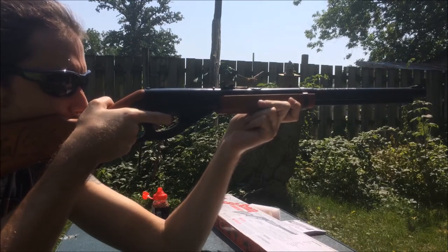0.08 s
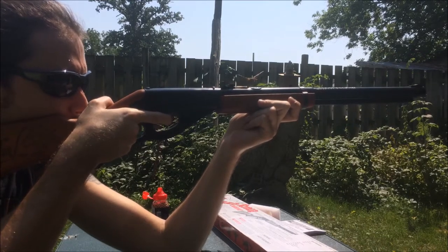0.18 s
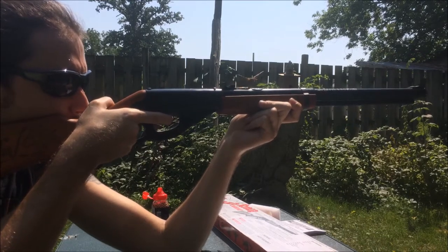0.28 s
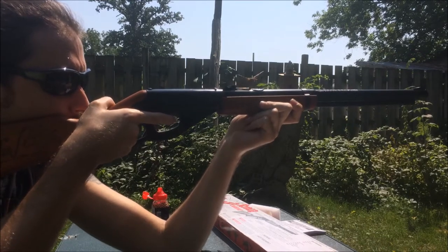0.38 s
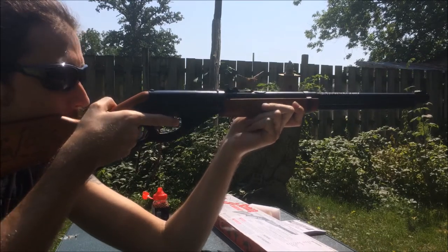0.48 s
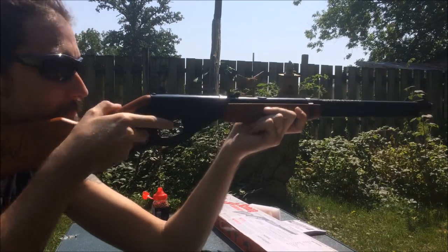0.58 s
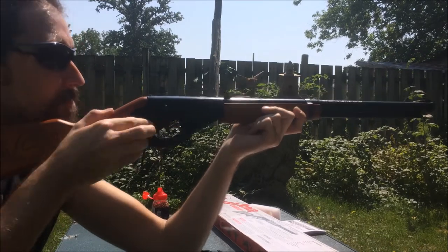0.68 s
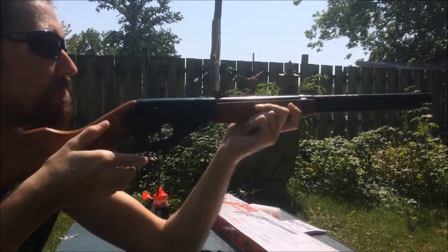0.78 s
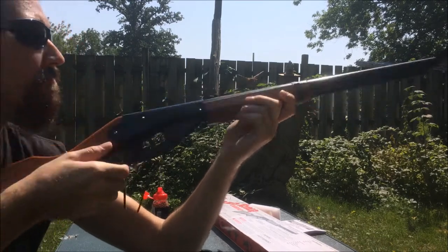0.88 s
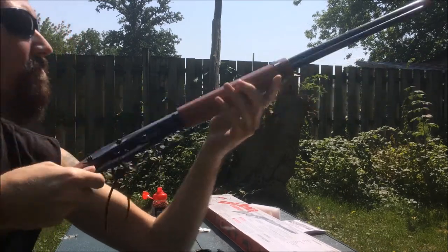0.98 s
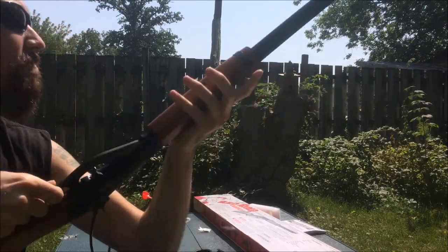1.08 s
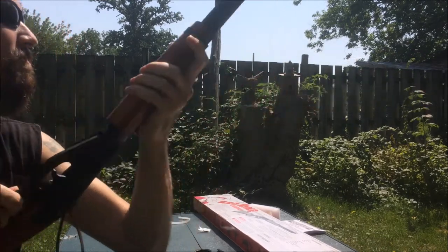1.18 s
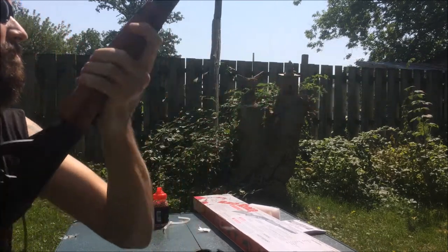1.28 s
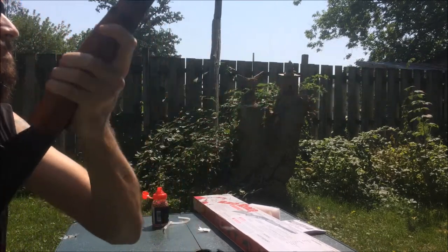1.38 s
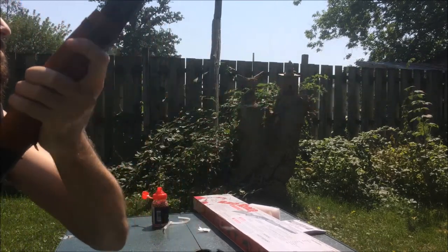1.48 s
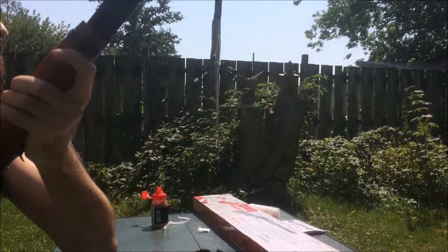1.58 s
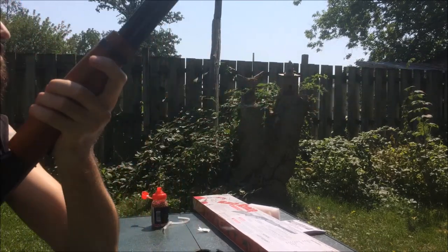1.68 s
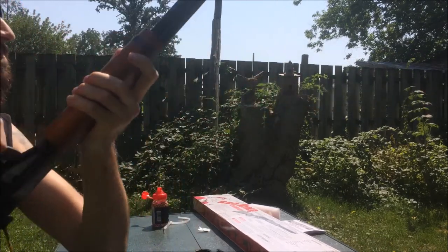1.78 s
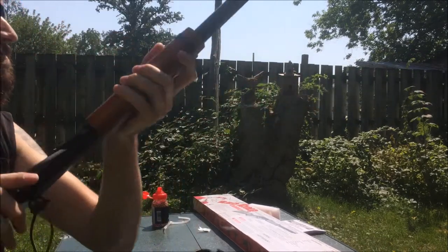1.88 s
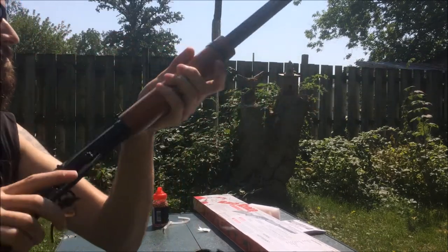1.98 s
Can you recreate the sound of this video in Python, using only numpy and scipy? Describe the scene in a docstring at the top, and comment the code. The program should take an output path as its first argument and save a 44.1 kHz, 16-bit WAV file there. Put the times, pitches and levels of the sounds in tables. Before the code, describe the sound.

A close air rifle fires with one sharp, rattly crack, and the pellet pings a metal target. Loose pellets then pour down the magazine and the cocking lever ratchets, against faint wind in a quiet yard.

```python
"""Lever-cocked spring air rifle, close, in a quiet fenced yard.
The piston slams and the spring chatters, ringing receiver and shroud; the pellet rings a metal target.
Rifle tilted up: loose pellets pour down the magazine, the lever ratchets, a few last pellets tick.
Background: wind, far traffic, leaves, insects."""
import sys
import numpy as np
from scipy import signal
from scipy.io import wavfile

SR = 44100
rng = np.random.default_rng(int(sys.argv[2]) if len(sys.argv) > 2 else 0)


def to_wav(sig):
    """Store sig (one row per channel, or 1-D mono) as 16-bit WAV at the path in sys.argv[1].

    Samples outside -1..1 are clipped; the rate is SR.
    """
    pcm = np.clip(np.atleast_2d(sig), -1, 1) * 32767
    pcm = np.round(pcm).astype(np.int16)
    wavfile.write(sys.argv[1], SR, pcm.T)  # frames by channels


N = 88200

# Levels are relative. Spectra are densities. Positive tilt favours the bass.
# trigger tick, piston slam, spring chatter: t/s, level/dB, tilt/(dB/oct)
SLAMS = [(0.1929, -31, 2), (0.209, -1, -0.5), (0.2119, -5.5, 2), (0.2171, -16, 7), (0.2196, -8.5, 1.5),
         (0.2263, -15, 4), (0.2385, -7, -0.5), (0.2457, -4.5, 1.2), (0.2535, -8, -3.5),
         (0.2592, -10.5, 1.5)]
SLAM_SPECTRUM = [(280, -6), (850, -4.5), (1200, 1), (2500, 6.5), (6000, 5.5), (16000, -1.5)]  # slam and tail noise: f/Hz, level/dB
TAIL_DECAY = [(200, 0.21), (1500, 0.16), (15000, 0.32)]  # rattling tail: f/Hz, t60/s
RECEIVER_MODES = [(153, -28.5, 0.015), (3620, -12.5, 0.031), (6770, -13.5, 0.042)]  # f/Hz, level/dB, t60/s
HITS = [(.3735, -2, 0), (.3852, -8, -1.5)]  # pellet on target, direct and second arrival: t/s, level/dB, tilt/(dB/oct)
TARGET_MODES = [(2202, -21, 1.1), (3640, -19, .5), (3984, -7, .37), (5087, -13, .4), (5356, -11, .44),
                (7510, -8, .15), (8053, -6, .13), (8505, -15, .4), (8690, -12, .22), (9247, -11, .23),
                (9782, -4, .24), (10460, -11, .16), (12224, -15, .2)]  # clear modes: f/Hz, level/dB, t60/s
SPLASH_SPECTRUM = [(300, -28), (2500, -12.5), (4000, -7.5), (9600, -2), (16000, -7.5)]  # target noise and weak modes: f/Hz, level/dB
TARGET_DECAY = [(1500, 0.56), (5000, 0.58), (15000, 0.35)]  # base decay of both: f/Hz, t60/s
POUR_ENVELOPE = [(.7, -73), (.96, -53), (1.0, -45.5), (1.12, -41), (1.155, -43), (1.172, -30.5),
                 (1.22, -24), (1.43, -22.5), (1.465, -34), (1.5, -47.5), (1.62, -32.5), (1.69, -38.5),
                 (1.72, -63.5)]  # rolling pellets: t/s, level/dB
POUR_SPECTRUM = [(2000, -18.5), (4200, -7.5), (6700, -4.5), (13300, -2.5), (15500, -6)]  # magazine tube: f/Hz, level/dB
TEETH = [(1.397, -20, 10.5), (1.4681, -8, -1.5), (1.486, -23, 2), (1.5025, -3.5, 0), (1.5253, -2, -1),
         (1.5494, -7, -0.7), (1.5799, -8.5, 2.5), (1.5843, -21, 1.5), (1.6098, -13.5, 3.5),
         (1.628, -17, 2.5), (1.6401, -8, 0.1)]  # ratchet clicks: t/s, level/dB, tilt/(dB/oct)
TOOTH_SPECTRUM = [(200, -39), (800, -21.5), (2050, -6), (4380, -4.5), (5870, -2), (12100, -11),
                  (16000, -14)]  # ratchet noise: f/Hz, level/dB
PAWL_MODES = [(5830, -15.5, 0.039), (11700, -28, 0.031), (13100, -28, 0.032)]  # f/Hz, level/dB, t60/s
LEVER_MODES = [(1365, .16), (1980, .04), (2347, .05)]  # f/Hz, t60/s
LEVER_BLOWS = [(1.5507, -37, -19.5, -25.5), (1.6128, -44, -41, -21.5), (1.64, -26.5, -45, -27.5)]  # t/s, then level/dB for each lever mode
TICKS = [(0.6182, -33, 11.5), (0.6716, -30.5, 9), (1.1672, -25, -4), (1.653, -15, 3.5), (1.736, -34, -4.5),
         (1.7794, -39, -1), (1.826, -27, 16), (1.9091, -34.5, 0.5)]  # single pellets: t/s, level/dB, tilt/(dB/oct)
TICK_SPECTRUM = [(1000, -38.5), (2500, -15.5), (8000, -5), (12000, -3), (16000, -9)]  # tick noise: f/Hz, level/dB
MAGAZINE_MODES = [(12000, -10, 0.041), (12860, -7, 0.035)]  # f/Hz, level/dB, t60/s
TRAFFIC_SPECTRUM = [(250, -9), (380, -10), (750, -2.5), (1200, -7), (2400, -16.5), (3700, -37)]  # f/Hz, level/dB
TRAFFIC_ENVELOPE = [(0, -50), (.45, -56), (.72, -50.5), (1.1, -50), (2, -48)]  # t/s, level/dB
LEAF_SPECTRUM = [(2500, 6), (8500, 7), (11000, -12), (15500, -22)]  # f/Hz, level/dB
LEAF_ENVELOPE = [(0, -68.5), (.6, -58), (1.8, -65.5), (2, -58)]  # t/s, level/dB
WIND_SPECTRUM = [(30, -6), (54, -1.9), (150, 1), (191, -3), (230, -21), (350, -20)]  # f/Hz, level/dB
INSECT_SPECTRUM = [(7600, -1), (9400, -2)]  # f/Hz, level/dB

SHROUD_HZ, SHROUD_GAIN_DB, SHROUD_T60_S = 122.5, -37, .13
CRACK_GAIN_DB = 10
RING_GAIN_DB, SPLASH_GAIN_DB, WEAK_GAIN_DB = -15, -13, -34.5
CLEAR_WAVER_DB, WEAK_WAVER_DB, WAVER_HZ = 1, 4.1, 40
POUR_CLICKS_PER_S, POUR_T60_CYCLES = 9000, 80
THUD_AT_S, THUD_HZ, THUD_DB, THUD_WIDTH_S = 1.36, 61, -30, .016
CUTOFF_HZ = 16900


def shot():
    """Piston and spring slams: hard crack, noise, receiver and hollow shroud modes, rattling tail."""
    s, db, tilt = np.transpose(SLAMS)
    receiver = struck_modes(SLAMS, RECEIVER_MODES)
    shroud_blows = clicks_at(s, db + SHROUD_GAIN_DB + 3 * tilt)
    shroud = sum(ring(shroud_blows, k * SHROUD_HZ, SHROUD_T60_S) for k in range(2, 6))
    crack = butter(-clicks_at(s, db + CRACK_GAIN_DB), 1, [1500, 9000], "band")
    tail = band_noise(SLAM_SPECTRUM, lambda hz: decay(.22, -22, at_hz(TAIL_DECAY, hz), hold_s=.05))
    noise = bursts(SLAMS, SLAM_SPECTRUM, gain_db=-9.5, treble_t60_s=.016, hold_s=.002)
    return noise + receiver + shroud + crack + tail


def target():
    """Struck thin metal: clear and weak modes waver as it swings; a noise splash dies by band."""
    s, db, tilt = np.transpose(HITS)
    detune, strength, sustain = rng.random((120, 3)).T
    weak_hz = np.linspace(1600, 15000, 120) + 500 * detune
    weak_db = WEAK_GAIN_DB + at_hz(SPLASH_SPECTRUM, weak_hz) + 5 * strength
    weak_t60_s = at_hz(TARGET_DECAY, weak_hz) * (.5 + .42 * sustain)
    modes = np.zeros(N)
    for hz, level, t60_s in TARGET_MODES:
        direct_hit = clicks_at(s[:1], level + RING_GAIN_DB)
        modes += ring(direct_hit, hz, t60_s) * from_db(CLEAR_WAVER_DB * drift(WAVER_HZ))
    for hz, level, t60_s in zip(weak_hz, weak_db, weak_t60_s):
        both_hits = clicks_at(s, level + db + tilt * np.log2(6000 / hz))
        modes += ring(both_hits, hz, t60_s) * from_db(WEAK_WAVER_DB * drift(WAVER_HZ))

    def splash_envelope(hz):
        levels_db = db + SPLASH_GAIN_DB + tilt * np.log2(6000 / hz)
        t60_s = .35 * at_hz(TARGET_DECAY, hz)
        return sum(decay(start_s, level, t60_s) for start_s, level in zip(s, levels_db))

    return modes + band_noise(SPLASH_SPECTRUM, splash_envelope)


def pellet_pour():
    """Clumped steel-on-steel clicks, each ringing one of 70 magazine tube modes."""
    envelope = from_db(in_time(POUR_ENVELOPE))
    clicks = from_db(3 * np.minimum(rng.exponential(1, N), 5)) * rng.choice([-1, 1], N)
    clicks *= rng.random(N) < POUR_CLICKS_PER_S / SR
    clicks *= from_db(2 * drift(34)) * envelope  # clumping
    modes_hz = np.linspace(2000, 15300, 70) * rng.uniform(.98, 1.02, 70)
    gains = from_db(at_hz(POUR_SPECTRUM, modes_hz)) * np.sqrt(modes_hz)
    mode_hit = rng.integers(0, 70, N)
    tube = sum(gains[k] * ring(clicks * (mode_hit == k), hz, POUR_T60_CYCLES / hz)
               for k, hz in enumerate(modes_hz))
    return unit_rms(butter(tube, 2, 2200, "high")) * np.sqrt(np.mean(envelope ** 2))


def lever_ratchet():
    """Each tooth gives a noise burst and rings the pawl; three blows ring the lever."""
    blow_s, *blow_db = np.transpose(LEVER_BLOWS)
    lever = sum(ring(clicks_at(blow_s, db), hz, t60_s) for db, (hz, t60_s) in zip(blow_db, LEVER_MODES))
    tooth_s, tooth_db, _ = np.transpose(TEETH)
    pawl = sum(ring(clicks_at(tooth_s, tooth_db + db), hz, t60_s) for hz, db, t60_s in PAWL_MODES)
    noise = bursts(TEETH, TOOTH_SPECTRUM, gain_db=-10, treble_t60_s=.033, hold_s=.0015)
    return noise + butter(lever, 2, 1000, "high") + pawl


def pellet_ticks():
    """Single pellets: a tiny burst plus the magazine's high modes."""
    noise = bursts(TICKS, TICK_SPECTRUM, gain_db=-1.5, treble_t60_s=.017, hold_s=.00044)
    return noise + struck_modes(TICKS, MAGAZINE_MODES)


def stock_thud():
    """Soft low bump as the stock is braced."""
    t = np.arange(N) / SR - THUD_AT_S
    return from_db(THUD_DB) * np.exp(-(t / THUD_WIDTH_S) ** 2) * np.sin(2 * np.pi * THUD_HZ * t)


def yard():
    """Far traffic, rustling leaves, gusty wind, a thin steady band of insects."""
    traffic = band_noise(TRAFFIC_SPECTRUM, lambda hz: from_db(2 * drift(10.2)))
    traffic *= from_db(in_time(TRAFFIC_ENVELOPE))
    leaves = band_noise(LEAF_SPECTRUM, lambda hz: from_db(3.45 * drift(30)))
    leaves *= from_db(in_time(LEAF_ENVELOPE))
    gust_db = 2.4 * drift(8.3)  # common to all bands
    wind = from_db(-47) * band_noise(WIND_SPECTRUM, lambda hz: from_db(gust_db + 2.3 * drift(10.4)))
    insects = from_db(-67) * band_noise(INSECT_SPECTRUM, lambda hz: 1)
    return traffic + leaves + wind + insects


def from_db(db):
    return 10 ** (np.asarray(db) / 20)


def unit_rms(x):
    return x / np.sqrt(np.mean(x ** 2) + 1e-20)


def in_time(rows):
    return np.interp(np.arange(N) / SR, *np.transpose(rows))


def at_hz(rows, hz):
    knots_hz, values = np.transpose(rows)
    return np.interp(np.log(hz), np.log(knots_hz), values)


def butter(x, order, hz, kind):
    return signal.sosfilt(signal.butter(order, hz, kind, fs=SR, output="sos"), x)


def drift(corner_hz):
    """Slow random signal, rms 1."""
    r = np.exp(-2 * np.pi * corner_hz / SR)
    return unit_rms(signal.lfilter([1], [1, -2 * r, r * r], rng.standard_normal(N + SR))[SR:])


def clicks_at(s, db):
    clicks = np.zeros(N)
    clicks[(np.asarray(s) * SR).astype(int)] = from_db(db)
    return clicks


def ring(clicks, hz, t60_s):
    """One mode: a unit click starts a decaying sine of height 1."""
    r, w = from_db(-60 / (t60_s * SR)), 2 * np.pi * hz / SR
    return signal.lfilter([0, np.sin(w)], [1, -2 * r * np.cos(w), r * r], clicks + 1e-18)


def struck_modes(blows, modes):
    """Each blow rings all modes, tilted about 4 kHz."""
    s, db, tilt = np.transpose(blows)
    return sum(ring(clicks_at(s, db + level + tilt * np.log2(4000 / hz)), hz, t60_s)
               for hz, level, t60_s in modes)


def decay(start_s, db, t60_s, hold_s=0):
    """Envelope: 0.8 ms rise, hold, exponential fall."""
    t = np.arange(N) / SR - start_s
    return np.clip(t / .0008, 0, 1) * from_db(db - 60 * np.maximum(t - hold_s, 0) / t60_s)


def band_noise(spectrum, envelope):
    """Noise in 21 bands, each under envelope(hz); rms near 1 at envelope 1."""
    edges_hz = np.geomspace(spectrum[0][0] / 1.12, min(spectrum[-1][0] * 1.05, .45 * SR), 22)
    centres_hz = np.sqrt(edges_hz[1:] * edges_hz[:-1])
    gains = from_db(at_hz(spectrum, centres_hz))
    gains /= np.sqrt(np.sum(gains ** 2 * np.diff(edges_hz)) * 2 / SR)
    white = rng.standard_normal((2, N))
    return sum(gains[k] * butter(white[k % 2] * envelope(hz) + 1e-18, 2, edges_hz[k:k + 2], "band")
               for k, hz in enumerate(centres_hz))


def bursts(blows, spectrum, gain_db, treble_t60_s, hold_s):
    """One noise burst per blow, tilted about 4 kHz; lows last longer."""
    def envelope(hz):
        t60_s = treble_t60_s * (1.93 if hz < 2500 else 1)
        return sum(decay(s, db + gain_db + tilt * np.log2(4000 / hz), t60_s, hold_s)
                   for s, db, tilt in blows)

    return band_noise(spectrum, envelope)


def scene():
    return (shot() + target() + pellet_pour() + lever_ratchet() + pellet_ticks()
            + stock_thud() + yard())[None]


def record(dry):
    """Deep bass cut, highest peaks rounded, top cut."""
    dry = butter(dry, 2, 35, "high")
    rounded = dry / (1 + np.abs(dry / 1.1) ** 4) ** .25
    return signal.sosfilt(signal.cheby2(10, 60, CUTOFF_HZ, fs=SR, output="sos"), rounded)


dry = scene()
out = record(dry)
to_wav(out)
```